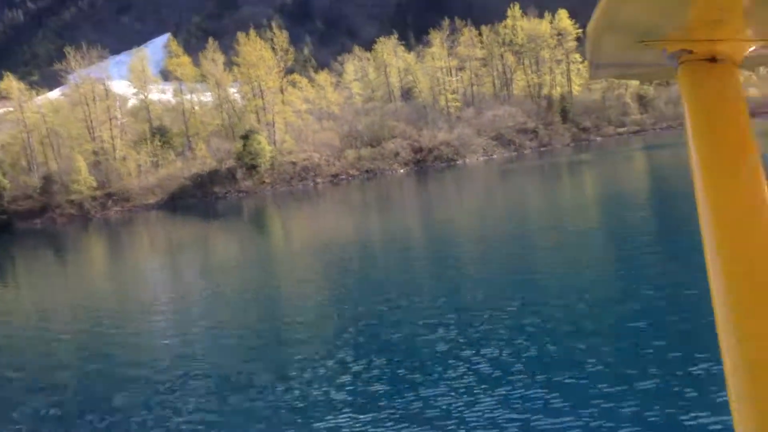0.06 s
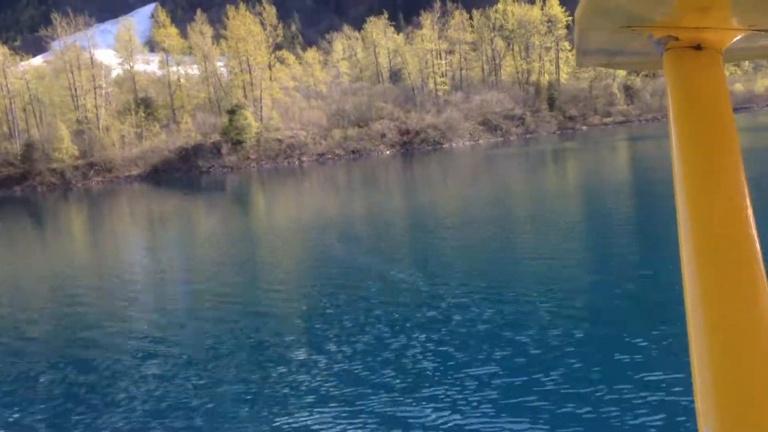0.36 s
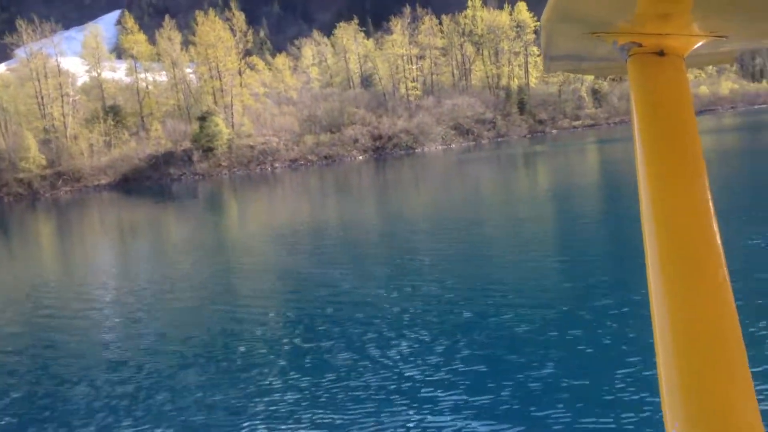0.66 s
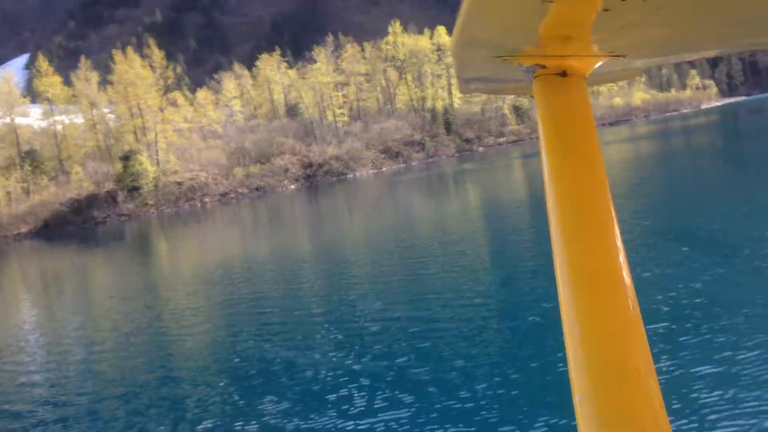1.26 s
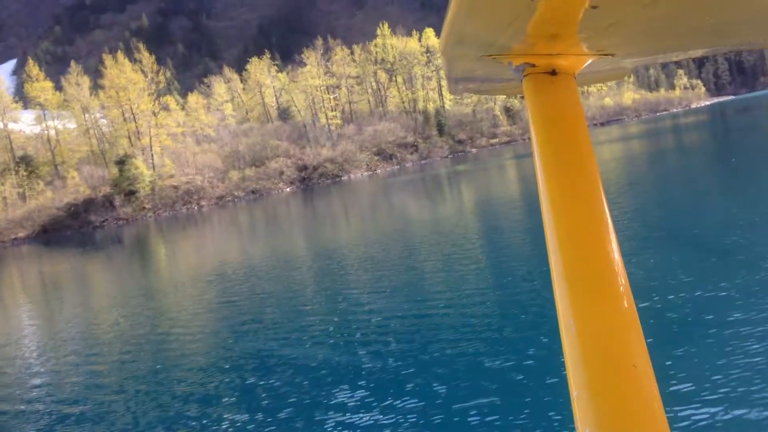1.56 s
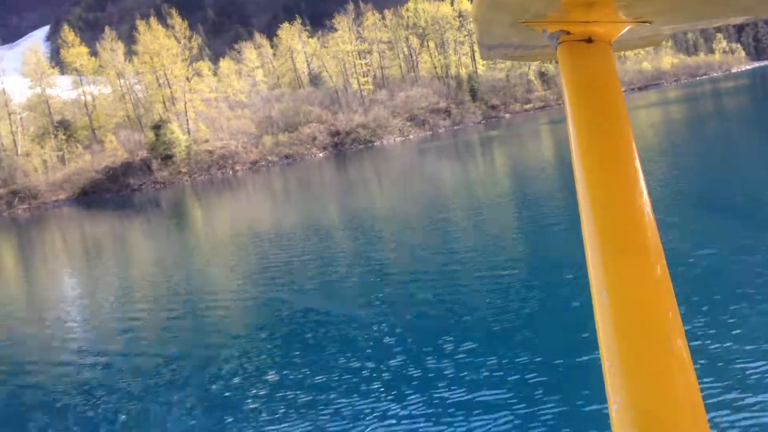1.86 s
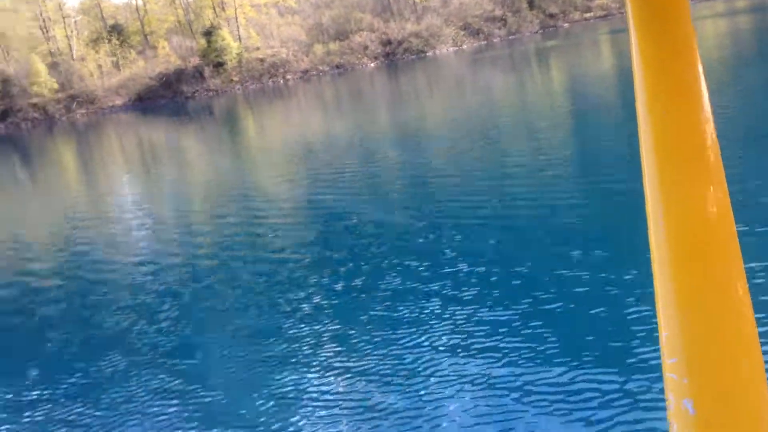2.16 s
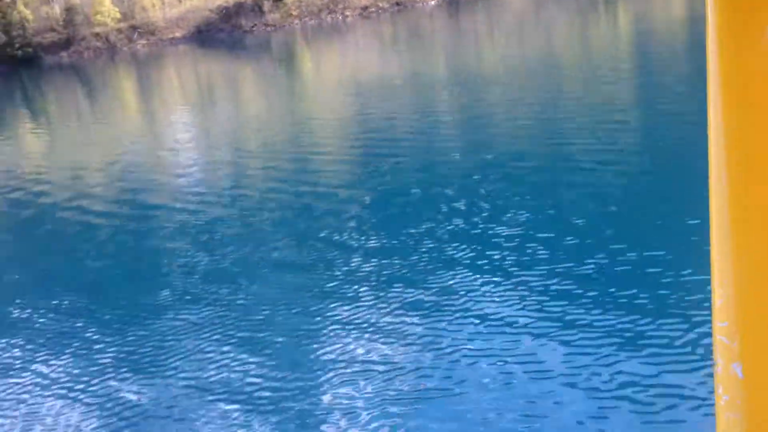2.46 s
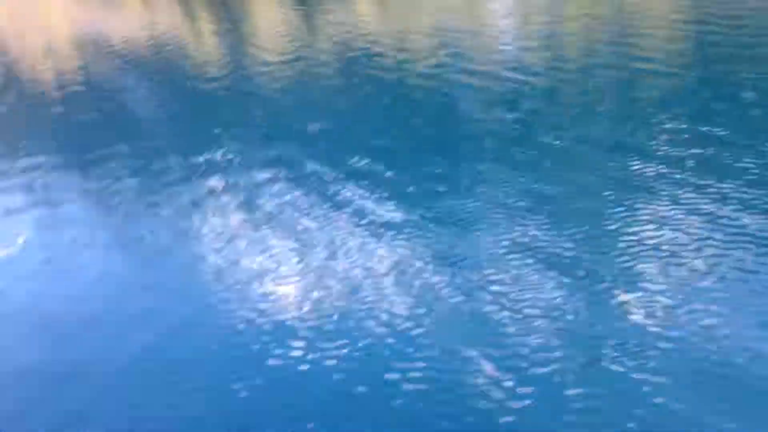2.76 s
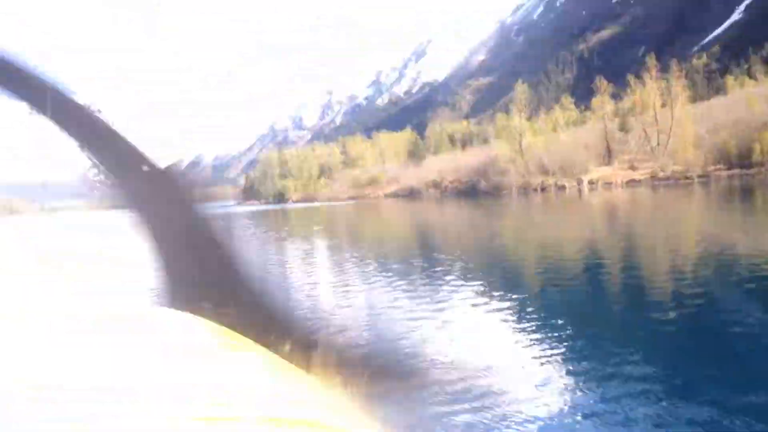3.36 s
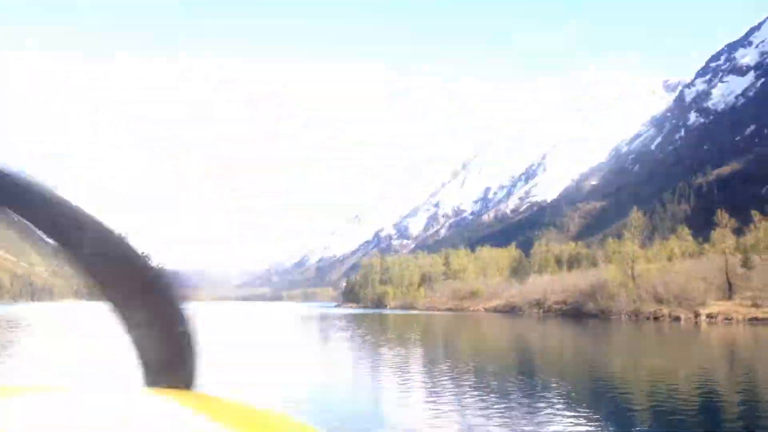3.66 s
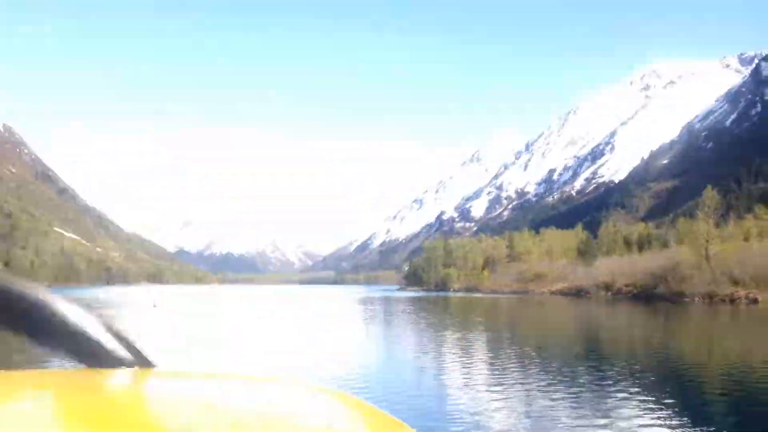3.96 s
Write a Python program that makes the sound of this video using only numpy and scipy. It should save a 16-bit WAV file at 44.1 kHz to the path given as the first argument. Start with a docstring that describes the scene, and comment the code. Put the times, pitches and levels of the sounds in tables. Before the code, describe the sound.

A floatplane's piston engine idles with a low throb, dull clatter and pulsing hiss, heard inside the cabin. Close plastic clicks and soft handling bumps come early, faint thin whines fade in, and a few more clicks follow.

```python
"""Microphone in the cabin of a floatplane taxiing on a lake, the piston engine idling at about 780 rpm.
From the start propeller and exhaust throb, the valve gear clatters in a fixed round and air hisses once
a turn. In the first second the handled camera adds rumble, hard plastic clicks and soft bumps sound close
by, and thin whines, probably instrument gyros, fade in. More clicks come near 1.7 s and 2.75 s, while
the handling rumble eases, the throb settles on a lower tone and clatter and hiss come slightly forward."""
import sys
import numpy as np
from scipy import signal
from scipy.fft import rfft, irfft, next_fast_len
from scipy.io import wavfile
from scipy.ndimage import map_coordinates

SR = 44100
rng = np.random.default_rng(int(sys.argv[2]) if len(sys.argv) > 2 else 0)


def transcribe(signal):
    """Save signal, clipped to [-1, 1], as a 16-bit WAV file at the path in sys.argv[1]."""
    frames = np.atleast_2d(signal).T
    limited = np.clip(frames, -1, 1)
    pcm = np.round(limited * 32767).astype(np.int16)
    wavfile.write(sys.argv[1], SR, pcm)


N = 176400
TIME_S = np.arange(N) / SR


def amp(db):
    """Decibels to gain."""
    return 10 ** (np.asarray(db) / 20)


def unit_rms(x):
    """x scaled to rms 1."""
    return x / np.sqrt(np.mean(x ** 2) + 1e-20)


def curves(rows):
    """One value per sample for each column after the time."""
    times, *columns = np.transpose(rows)
    return [np.interp(TIME_S, times, column) for column in columns]


def wobble(rate_hz):
    """A smooth random curve with rate_hz knots a second."""
    knots = rng.standard_normal(int(N * rate_hz / SR) + 4)
    return map_coordinates(knots, [TIME_S * rate_hz], mode="nearest")


def filtered(x, response):
    """x through a filter whose gain is response(hz)."""
    size = next_fast_len(N + SR // 2)
    return irfft(rfft(x, size) * response(np.fft.rfftfreq(size, 1 / SR)), size)[:N]


def coloured(x, colour):
    """x shaped by rows of frequency_hz, gain_db, then scaled to rms 1."""
    knots_hz, db = np.transpose(colour)
    return unit_rms(filtered(x, lambda hz: amp(np.interp(np.log(hz + 1), np.log(knots_hz), db))))


# thin whines in the cabin: pitch_hz
WHINE_HZ = [1827, 1921, 2031, 2088, 1865, 8890, 9150]
# the same whines, timed at mid-fade: level_db, flutter_hz, start_s, end_s
WHINES = [(-53, 1.74, .7, 4.8), (-79.5, 3, 0.6, 3.3), (-52.5, 2.2, 0.38, 3.8), (-48.5, 20.3, 0.45, 3.47),
          (-47.5, 18.2, 3.48, 4.7), (-65, 20.4, 0.8, 2.8), (-60, 25, 3.54, 4.2)]
def rotor_whines(fade_s=0.75, flutter_rate_hz=40):
    """Small fast rotors sing thin tones that flutter in pitch and level."""
    out = np.zeros(N)
    for hz, (db, flutter_hz, start, end) in zip(WHINE_HZ, WHINES):
        fade = np.clip(np.minimum(TIME_S - start, end - TIME_S) / fade_s + .5, 0, 1)
        turns = np.cumsum(hz + flutter_hz * wobble(flutter_rate_hz)) / SR
        out += fade * amp(db + 1.37 * wobble(18)) * np.sqrt(2) * np.sin(2 * np.pi * turns)
    return out


# colour of the air around the microphone: frequency_hz, gain_db
AIR_COLOUR = [(200, -3), (700, 4.5), (1400, -2), (1750, 6), (1980, 2), (2090, 4.5), (2250, 0.5),
              (2700, -3.5), (3500, -5.5), (4600, -3), (6500, -6), (8000, -14), (9100, -12), (10500, -23),
              (15000, -81)]
def air_rush(level_db=-40.5):
    """Air rushes steadily as broad noise."""
    return amp(level_db) * coloured(rng.standard_normal(N), AIR_COLOUR)


# puffs within one shaft turn: centre_turns, spread_turns, base_pitch_hz, half_width_hz, base_level_db
PUFFS = [(.17, .15, 5980, 238, -44), (.55, 0.2, 5550, 300, -46.5), (.68, 0.14, 7030, 554, -48.5)]
# slow drift of all puffs: time_s, pitch_ratio, gain_db
PUFF_DRIFT = [(0, 1.06, -3.5), (.9, 0.88, -4), (1.6, 0.94, -1.5), (2.4, .95, 0), (3.2, 1, 1),
              (4, 1.04, 0.5)]
def air_puffs(cycle):
    """Narrow bands of hiss come round with each turn of the shaft."""
    pitch_ratio, drift_db = curves(PUFF_DRIFT)
    out = np.zeros(N)
    for centre, spread, hz, half_width, db in PUFFS:
        offset_turns = (2 * cycle - centre + .5) % 1 - .5
        swell = np.exp(-.5 * (offset_turns / spread) ** 2)
        band = filtered(rng.standard_normal(N), lambda f: 1 / (1 + ((f - hz) / half_width) ** 2))
        shift = np.exp(2j * np.pi * np.cumsum(hz * (pitch_ratio - 1)) / SR)  # slides the band in pitch
        out += amp(db + drift_db) * swell * (signal.hilbert(unit_rms(band)) * shift).real
    return out


# brief rubs: centre_s, level_db, spread_s
SCUFFS = [(0.191, -35.5, 0.011), (0.488, -33, 0.0073), (0.536, -39, 0.011), (3.25, -38, .004)]
# their colour: frequency_hz, gain_db
SCUFF_COLOUR = [(400, -26), (1200, 6), (1900, -0.5), (2400, 1.5), (3200, -5), (7000, -14), (15000, -26)]
def scuffs():
    """Faint short rubs swell and fade without a sharp attack."""
    swell = sum(amp(db) * np.exp(-.5 * ((TIME_S - centre) / spread) ** 2)
                for centre, db, spread in SCUFFS)
    return swell * coloured(rng.standard_normal(N), SCUFF_COLOUR)


# bumps close to the microphone: start_s, level_db, pitch_hz, t60_s
BUMPS = [(.0, -11.5, 105.8, 0.26), (0.162, -9, 113, 0.17), (.207, -6, 130, 0.052), (.92, -14, 101, 0.094)]
def soft_bumps(rise_s=0.0022):
    """Each soft thud is one low, quickly damped tone."""
    out = np.zeros(N)
    for start, db, hz, t60 in BUMPS:
        age = np.maximum(TIME_S - start, 0)
        attack = 1 - np.exp(-age / rise_s)
        out += amp(db - 60 * age / t60) * attack * np.sin(2 * np.pi * hz * age)
    return out


# clicks close to the microphone: start_s, snap_db, knock_db, clack_db, noise_t60_s
CLICKS = [(0.067, -27, -41, -55, 0.047), (.144, -15, -23.5, -17.5, 0.053), (0.401, -24, -24.5, -50, .04),
          (.518, -39.5, -35, -40, 0.084), (0.625, -26, -22, -50, 0.047), (1.626, -14.5, -23, -14.5, 0.058),
          (1.693, -25, -21, -44, 0.067), (1.725, -38, -34, -43, .05), (2.751, -22.5, -16.5, -36, 0.043)]
# noise colours of snap, knock and clack: frequency_hz, gain_db
SNAP_COLOUR = [(300, -18), (900, -9), (1300, 6), (1650, -3), (2200, 3), (3200, 3.5), (4300, 5), (5400, 0),
               (6500, 0.5), (7700, 0.5), (8900, 2), (10500, 1), (12200, -0.5), (15500, -8)]
KNOCK_COLOUR = [(120, 1.5), (330, 10), (520, 0), (760, 6), (900, 0), (1050, -12), (1280, 1), (1600, -17),
                (3000, -29), (8000, -48)]
CLACK_COLOUR = [(400, 0), (1100, 8.5), (1500, 2.5), (2050, 1), (2370, 8.5), (2800, -32), (3500, 5.5),
                (4500, -32), (6000, 3), (9000, -53), (12500, 0), (15500, 4)]
# modes of the clacking part: pitch_hz
CLACK_HZ = [2335, 2395, 3480, 5426, 11920, 12070, 12980]
# the same modes, relative to the clack: gain_db, t60_s
CLACK_MODES = [(-2.5, .05), (0, .055), (-6, .04), (-15, .05), (-21, .1), (-19, .08), (-21, .07)]
# hollow modes, relative to the knock: pitch_hz, gain_db, t60_s
KNOCK_MODES = [(325, -5, .05), (480, -7, .035), (710, -1, .04), (865, -2, .03), (4300, -11, .03)]
def plastic_clicks(rise_s=0.00084, hold_s=0.0022):
    """Hard plastic gives a bright snap and a hollow knock; the hardest clicks add a ringing clack."""
    out = np.zeros(N + SR)
    length = SR // 2
    age = np.arange(length) / SR
    noises = np.array([coloured(rng.standard_normal(N), colour)
                       for colour in (SNAP_COLOUR, KNOCK_COLOUR, CLACK_COLOUR)])
    mode = lambda hz, db, t60: amp(db - 60 * age / t60) * np.sin(2 * np.pi * hz * age)
    ring = sum(mode(hz, db, t60) for hz, (db, t60) in zip(CLACK_HZ, CLACK_MODES))
    hollow = sum(mode(hz, db, t60) for hz, db, t60 in KNOCK_MODES)
    attack = 1 - np.exp(-age / rise_s)
    for start, snap_db, knock_db, clack_db, t60 in CLICKS:
        offset = rng.integers(N - length)
        grit = amp([snap_db, knock_db, clack_db]) @ noises[:, offset:offset + length]
        burst = grit * amp(-60 * np.maximum(age - hold_s, 0) / t60)
        click = attack * (burst + amp(clack_db) * ring + amp(knock_db) * hollow)
        out[round(start * SR):][:length] += click
    return out[:N]


# idle speed, in four-stroke cycles of two shaft turns: time_s, cycle_rate_hz
ENGINE_SPEED = [(0, 6.49), (.9, 6.48), (1.5, 6.555), (2.3, 6.49), (3.0, 6.475), (3.6, 6.52), (4, 6.51)]
START_CYCLE_HZ = ENGINE_SPEED[0][1]
def engine_cycles():
    """Running count of engine cycles as the idle wanders slightly."""
    cycle_rate_hz, = curves(ENGINE_SPEED)
    return np.cumsum(cycle_rate_hz) / SR


def engine_noise(cycle, repeat_share):
    """Noise of which a share of the power comes back alike in every engine cycle."""
    size = int(SR / START_CYCLE_HZ)
    position = (cycle % 1 * size).astype(int) % size
    repeating = rng.standard_normal(size)[position]
    return np.sqrt(repeat_share) * repeating + np.sqrt(1 - repeat_share) * rng.standard_normal(N)


# valve blows in one cycle and their strength in each resonance: start_cycles, low_db, middle_db, high_db
VALVE_BLOWS = [(.015, -19, -4.5, -6.5), (.1, -5.5, 0, -1.5), (.17, -22, -6, -10), (.33, -8, -8.5, -1.5),
               (.505, -3, -7, -6), (.56, -3.5, -0.5, -13), (.62, -3, -3.5, -13), (.75, 0, -2, -10.5),
               (.835, 0, -1.5, 0), (.89, -5, -3, -4)]
# low, middle and high body resonance behind the firewall: base_level_db
BODY_DB = [-37, -35.5, -42]
# one colour for each resonance: frequency_hz, gain_db
BODY_COLOURS = [
    [(150, -4), (275, -6), (320, -3.5), (390, -4.5), (450, 5.5), (520, -6), (620, -9), (1200, -52.5)],
    [(300, -41), (520, -7), (600, -2.5), (670, 3.5), (760, -7.5), (860, -10), (1000, -21.5), (2000, -66)],
    [(450, -16), (780, 0), (880, 2), (970, -1), (1070, 1), (1250, -3.5), (1600, -14.5), (2500, -17),
     (6000, -54)],
]
# the clatter comes forward: time_s, gain_db
CLATTER_GAIN = [(0, -2), (1, -2), (2, -0.5), (3, -0.5), (4, 0)]
def valve_clatter(cycle, swell_s=.0046, floor_gain=.38):
    """The valve gear strikes the same round of dull blows each cycle, exciting three body resonances."""
    starts, *strengths_db = np.transpose(VALVE_BLOWS)
    age_in_swells = ((cycle - starts[:, None]) % 1) / START_CYCLE_HZ / swell_s
    blow_power = (age_in_swells * np.exp(1 - age_in_swells)) ** 2
    out = np.zeros(N)
    for strength_db, db, colour in zip(strengths_db, BODY_DB, BODY_COLOURS):
        force = np.sqrt(amp(strength_db) ** 2 @ blow_power + floor_gain ** 2)
        out += amp(db) * coloured(force * engine_noise(cycle, repeat_share=.45), colour)
    gain_db, = curves(CLATTER_GAIN)
    return amp(gain_db) * out


# colour of the low rumble at the microphone: frequency_hz, gain_db
RUMBLE_COLOUR = [(20, -18), (35, -13), (52, -15), (75, -1.5), (92, -7.5), (110, 4.5), (130, -2.5),
                 (165, -3.5), (200, -3.5), (240, -10.5), (330, -13.5), (450, -22.5), (900, -48)]
# louder at first, while the camera is handled: time_s, base_level_db
RUMBLE_LEVEL = [(0, -28), (.2, -23.5), (.35, -27), (.8, -26.5), (1.2, -28), (2, -30), (3, -29.5),
                (4, -31.5)]
def low_rumble(cycle, lift_db=0.5):
    """Engine and camera handling make one low rumble, part of which repeats each engine cycle."""
    level_db, = curves(RUMBLE_LEVEL)
    return amp(level_db + lift_db) * coloured(engine_noise(cycle, repeat_share=0.43), RUMBLE_COLOUR)


# the two main tones, near 78 and 104 Hz: multiple_of_cycle_rate
MAIN_ORDERS = [12, 16]
# they trade places: time_s, lower_tone_db, upper_tone_db
MAIN_LEVELS = [(0, -41, -21.5), (.12, -34, -28.5), (.45, -34, -28.5), (.88, -27.5, -28.5),
               (1.08, -31.5, -38), (1.798, -27.5, -32), (2.55, -26, -50), (3.3, -27.5, -39), (4, -27, -45)]
# the weaker tones: multiple_of_cycle_rate
WEAK_ORDERS = [8, 9, 10, 13, 21, 31, 35, 43, 48, 60, 69]
# the same tones: level_db
WEAK_LEVELS = [-40.5, -47, -40, -39.5, -42.5, -35, -45, -46, -51, -53, -49]
def propeller_and_exhaust(cycle, waver_db=1.8, waver_rad=.2):
    """Propeller and exhaust throb in tones locked to the shaft, wavering in level and phase."""
    out = np.zeros(N)
    for order, db in zip(MAIN_ORDERS + WEAK_ORDERS, curves(MAIN_LEVELS) + list(WEAK_LEVELS)):
        gain = amp(db + waver_db * wobble(4.3))
        phase = 2 * np.pi * (order * cycle + rng.random()) + waver_rad * wobble(6)
        out += gain * np.sqrt(2) * np.sin(phase)
    return out


def scene():
    """One spot in the cabin: the shaft times throb, clatter and puffs; the small sounds lie on top."""
    cycle = engine_cycles()
    main = propeller_and_exhaust(cycle) + low_rumble(cycle) + valve_clatter(cycle)
    background = air_rush() + air_puffs(cycle) + rotor_whines()
    close_by = plastic_clicks() + scuffs() + soft_bumps()
    return (background + close_by + main)[None]


def record(dry):
    """The camera's mono microphone track keeps nothing above its band limit."""
    top_hz = 15400
    return filtered(dry[0], lambda hz: hz < top_hz)[None]


dry = scene()
out = record(dry)
transcribe(out)
```